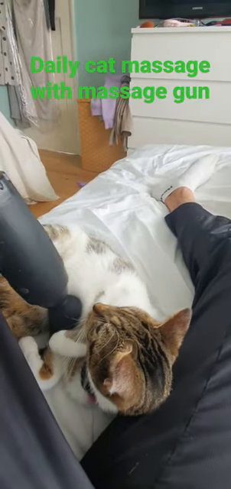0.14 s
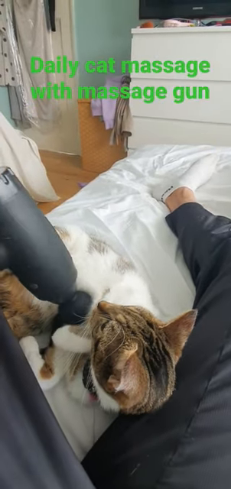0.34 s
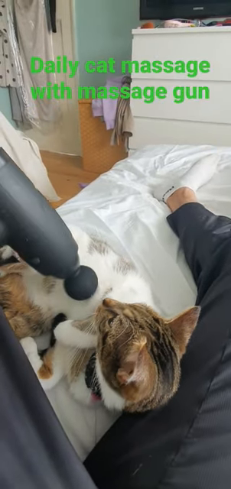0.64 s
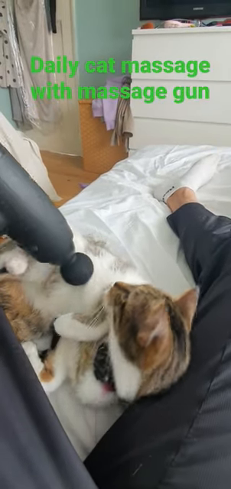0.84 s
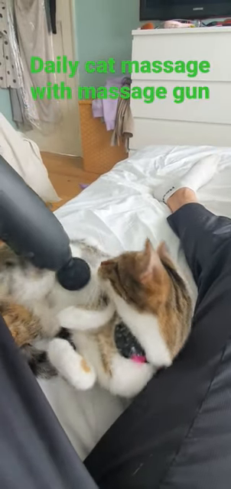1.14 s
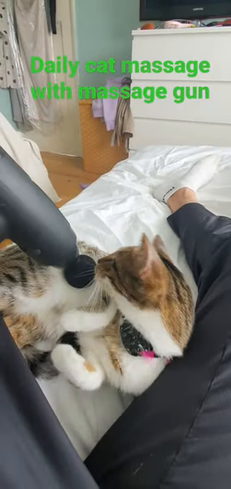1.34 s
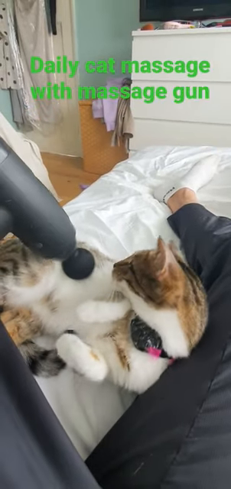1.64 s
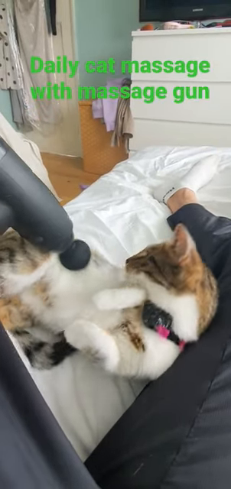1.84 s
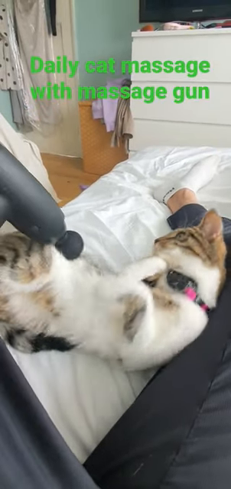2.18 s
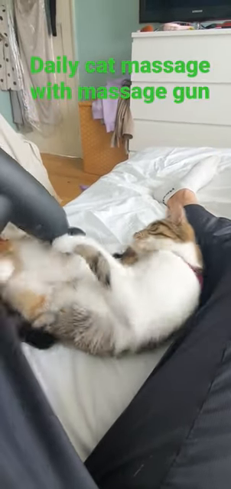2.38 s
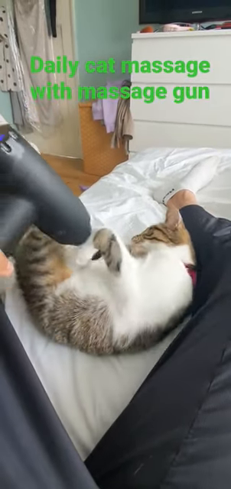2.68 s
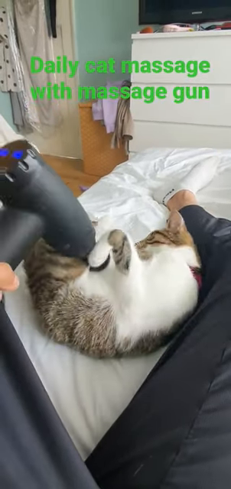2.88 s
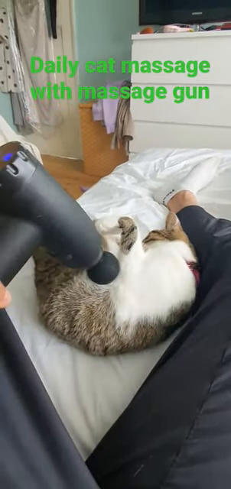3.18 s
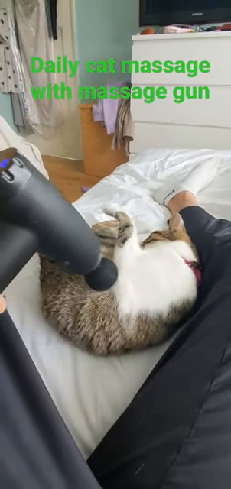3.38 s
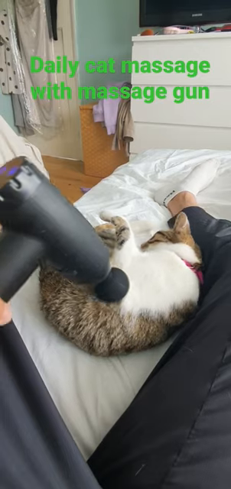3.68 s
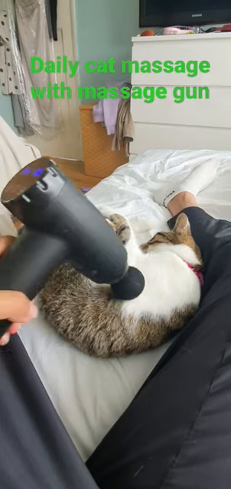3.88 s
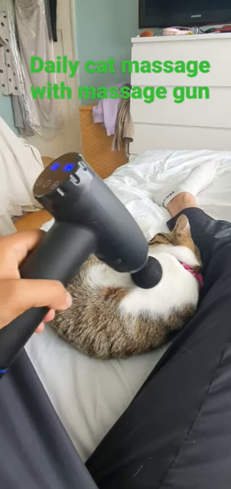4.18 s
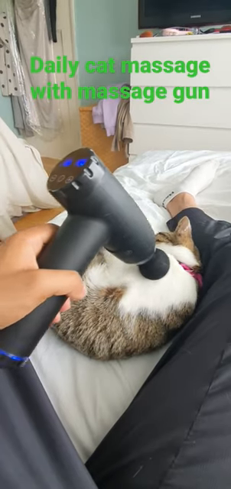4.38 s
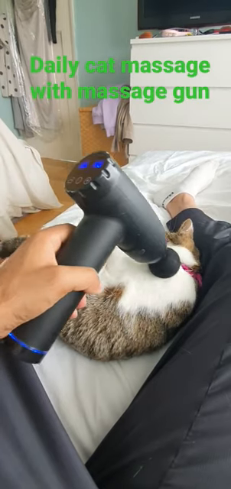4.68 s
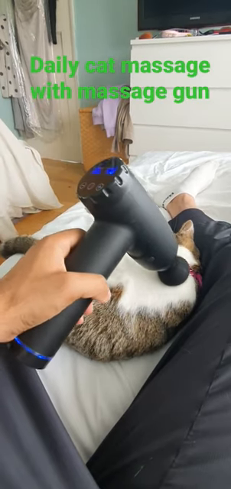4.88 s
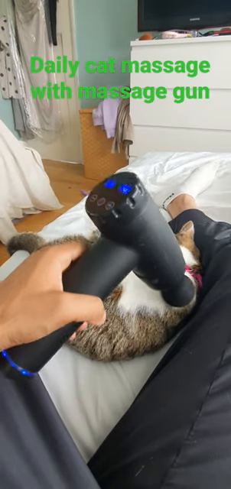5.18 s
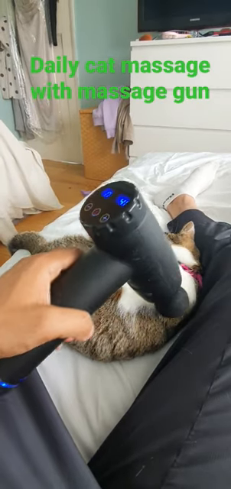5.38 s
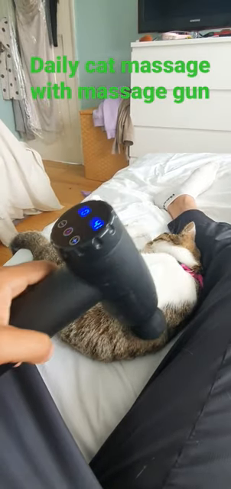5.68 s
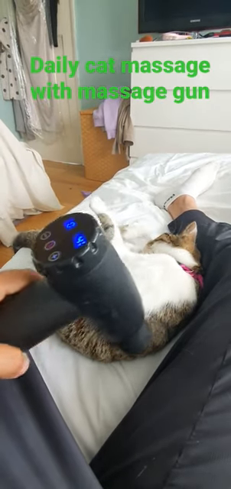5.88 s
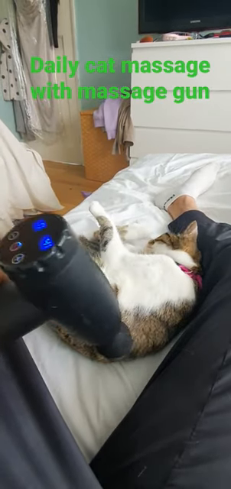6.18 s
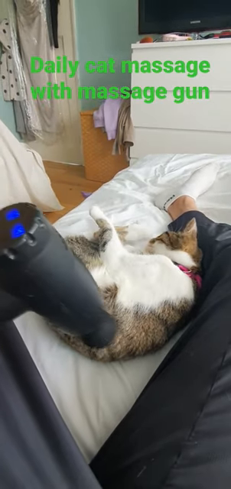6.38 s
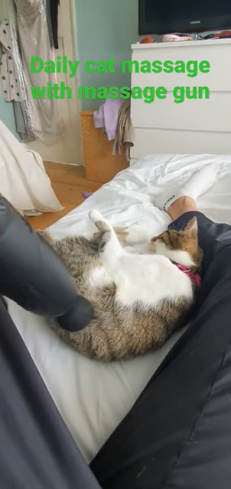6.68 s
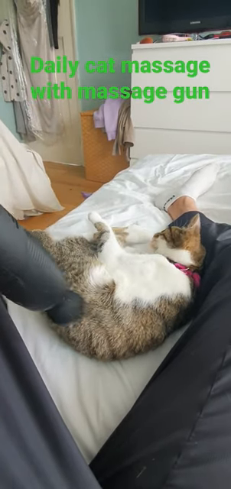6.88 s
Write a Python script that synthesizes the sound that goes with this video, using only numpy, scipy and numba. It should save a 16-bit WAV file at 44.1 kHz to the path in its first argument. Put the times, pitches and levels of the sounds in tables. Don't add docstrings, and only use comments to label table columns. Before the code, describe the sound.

A handheld percussion massager runs throughout, a steady low electric hum with a gritty casing buzz and gently surging pitch. Around one second its ball raps rapidly on something hard; fur and bedding rustle as a cat rolls over, with light glancing taps. A claw ticks, then a louder, hollower burst of knocks follows just after three seconds. The hum continues to the end. Close stereo phone microphone, quiet bedroom.

```python
import sys
import numpy as np
from scipy import signal
from scipy.io import wavfile
from scipy.ndimage import uniform_filter1d
from numba import njit

SR = 44100
rng = np.random.default_rng(int(sys.argv[2]) if len(sys.argv) > 2 else 0)


def wav_out(sig):
    wavfile.write(sys.argv[1], SR, np.round(np.clip(np.atleast_2d(sig).T, -1, 1) * 32767).astype(np.int16))


def level_to_linear(level):
    exponent = np.asarray(level, float) / 20
    return 10 ** exponent


N = 310464
HOP = 256


def evened(x):
    return x / np.sqrt(np.mean(x ** 2) + 1e-20)


def read(points, hz):
    f, value = np.transpose(points)
    return np.interp(np.log(hz + 1), np.log(f + 1), value)


def curves(rows):
    s, *columns = np.vstack(rows).T
    return [np.interp(np.arange(N) / SR, s, c) for c in columns]


def sides(pan_db):
    return level_to_linear(np.array([pan_db / 2, -pan_db / 2]))


def add(mix, start_s, sound):
    part = mix[:, round(start_s * SR):][:, :sound.shape[1]]
    part += sound[:, :part.shape[1]]


def resonate(x, hz, width_hz):
    return signal.lfilter(*signal.iirpeak(hz, hz / max(width_hz, 5), SR), x)


def swell(t, peak_s):
    return t / peak_s * np.exp(1 - t / peak_s)


def wander(shape, seconds):
    size = max(round(seconds * SR / HOP), 1)
    return evened(uniform_filter1d(uniform_filter1d(rng.standard_normal(shape), size), size))


def hiss(spectrum, patchy_db=2.0, flicker_db=1.5):
    # hz, left_right_likeness
    likeness = [(60, 0.77), (290, 1), (640, 0.6), (2000, 0.04), (6000, 0.011), (15000, 0.032)]
    # hz, left_right_db
    tilt = [(60, -8), (240, 4.5), (950, -2), (3770, -4), (15000, -7)]
    frames, hz = N // 128 + 5, np.fft.rfftfreq(512, 1 / SR)
    a, b, c, d, patches = rng.standard_normal((frames, 257, 5)).T
    patches = evened(uniform_filter1d(uniform_filter1d(patches, 16, 1), 8, 0))
    same = np.clip(read(likeness, hz), -1, 1)[:, None]
    left = a + 1j * b
    right = same * left + np.sqrt(1 - same ** 2) * (c + 1j * d)
    flicker = flicker_db * rng.standard_normal(frames)
    z = np.array([left, right]) * level_to_linear(read(spectrum, hz)[:, None] + patchy_db * patches + flicker)
    z *= sides(read(tilt, hz))[:, :, None]
    return evened(signal.istft(z, nperseg=512, noverlap=384)[1][:, :N])


def room(level_db=-60):
    # hz, density_db_per_hz
    air = [(15, -30), (30, -8), (70, 6), (150, -26), (260, -6), (500, -20), (1000, -15), (2500, -26.5),
           (4800, -31.5), (6800, -35), (8800, -39.5), (12500, -39.5), (15600, -38)]
    return level_to_linear(level_db) * hiss(air)


def rustle(split_hz=4600, firm_db_per_db=0.29, rest_db=-75.5, pan_db_per_db=-0.15):
    # peak_s, level_db, rise_db_per_s, fall_db_per_s
    rubs = [
        (.65, -68.5, 16, 16),
        (1.48, -60.5, 18, 80),
        (2.1, -60.5, 30, 44),
        (2.45, -48.5, 62, 70),
        (2.68, -64, 44, 50),
        (2.95, -67.5, 26, 50),
        (3.32, -66.5, 20, 17),
        (4.2, -67.5, 15, 9),
        (5.15, -67, 13, 25),
        (6.55, -64, 8.5, 13),
    ]
    # hz, density_db_per_hz
    fur = [(500, -51), (1000, 7.5), (2400, -2.5), (4200, -6.5), (7000, -2), (8800, -10), (12000, -10),
           (15600, -11)]
    t = np.arange(N) / SR
    power = level_to_linear(rest_db) ** 2
    for s, db, rise, fall in rubs:
        power = power + level_to_linear(db - np.where(t < s, rise, -fall) * (s - t)) ** 2
    level_db = 10 * np.log10(power)
    pan_db = pan_db_per_db * level_db
    rub = hiss(fur)
    middle = signal.sosfiltfilt(signal.butter(3, split_hz, fs=SR, output="sos"), rub)
    top = rub - middle
    rub = top + middle * level_to_linear(firm_db_per_db * (level_db - level_db.max()))
    return level_to_linear(level_db) * sides(pan_db - pan_db.mean()) * rub


def ticks():
    # start_s, peak_db, colour_hz, left_right_db
    claw = [
        (2.9248, -38, 5500, -13),
        (2.9305, -35, 3600, -5),
        (4.926, -57, 3670, -3),
    ]
    out, t = np.zeros((2, N)), np.arange(4000) / SR
    highpass = signal.butter(3, 2600, "highpass", fs=SR, output="sos")
    decay = level_to_linear(-60 * t / 0.0045) + level_to_linear(-20 - 60 * t / 0.15)
    for s, db, hz, pan_db in claw:
        grit = rng.standard_normal(len(t)) + .5 * rng.standard_normal((2, len(t)))
        thin = signal.sosfilt(highpass, grit)
        rung = resonate(resonate(thin, 0.98 * hz, 3300), 0.98 * hz, 3300)
        colour = evened(0.15 * thin + rung)
        add(out, s, level_to_linear(db - 0.5) * sides(pan_db)[:, None] * colour * decay)
    return out


def contacts(rebound_s=.0106, weak_lag_s_per_db=.0004, rebound_hz=1300):
    # start_s, ring_peak_db, ring_hz, snap_re_ring_db, rebound_peak_db
    first_bout = [
        (1.1954, -37.5, 1440, -23, -43.5),
        (1.2237, -46, 1310, -20, -46),
        (1.255, -39, 950, -19, -41.5),
        (1.2891, -40, 910, 2, -37.5),
        (1.3223, -30, 1110, -19, -37.5),
        (1.3533, -41, 2170, 3.5, -42.5),
        (1.3868, -42, 925, 10.5, -37.5),
        (1.4199, -32, 1160, -14.5, -37.5),
    ]
    second_bout = [
        (3.0966, -35, 1260, -40, -34.5),
        (3.1325, -34.5, 1350, -36, -38),
        (3.1604, -27, 1570, -39, -35.5),
        (3.1939, -24.5, 1280, -47, -32.5),
        (3.2252, -29, 1180, -26, -36.5),
        (3.256, -33, 1620, -60, -44),
    ]
    # start_s, ring_peak_db, ring_hz, left_right_db
    grazes = [(1.0067, -46, 935, -2), (1.484, -48, 1310, 0), (2.534, -46, 1110, -9),
              (2.5425, -42, 1400, -10), (2.5505, -38.5, 1270, -5), (2.5582, -41.5, 905, -10),
              (2.5707, -48, 900, 7), (2.5982, -41.5, 1000, 1), (2.632, -40.5, 840, -6),
              (2.6514, -48, 1270, 7), (2.662, -44.5, 1040, -9), (2.6776, -40, 1110, 7),
              (2.687, -45.5, 1380, 7), (2.6945, -47, 1290, -11), (2.711, -45, 910, 1),
              (2.7758, -51, 1470, -6), (2.8256, -48.5, 2980, -3), (5.153, -45.5, 1280, -4),
              (5.1854, -46.5, 1350, 2), (5.213, -48, 1350, -7)]
    rows = [(s, db, hz, -18, -1.5, pan_db) for s, db, hz, pan_db in grazes]
    # rebound_snap_db, rebound_push_db, strike_left_right_db, rebound_left_right_db
    first_feel, second_feel = (-9.5, 2.5, -5.5, 7.5), (-18, -1, 1, -6.5)
    for bout, feel in ((first_bout, first_feel), (second_bout, second_feel)):
        back_snap_db, back_push_db, pan_db, back_pan_db = feel
        for s, db, hz, snap_db, back_db in bout:
            push_db = 7 + 0.46 * snap_db
            back_s = s + rebound_s + weak_lag_s_per_db * max(-40 - back_db, 0)
            rows.append((s, db, hz, snap_db, push_db, pan_db))
            rows.append((back_s, back_db, rebound_hz, back_snap_db, back_push_db, back_pan_db))
    return rows


def knocks(ring_s=0.0011, shell_hz=690, shell_s=0.0023, push_hz=170, push_s=0.0012, port_lag_rad=1.36):
    out, t = np.zeros((2, N)), np.arange(2600) / SR
    bright = signal.butter(6, (1600, 6500), "bandpass", fs=SR, output="sos")
    lag = port_lag_rad * np.array([[0], [1]])
    late = t - .0038
    push = np.exp(-(late / push_s) ** 2) * np.cos(2 * np.pi * push_hz * late)
    push = push + 0.096 * swell(t, 0.0095) * np.sin(2 * np.pi * 95 * t)
    for s, db, hz, snap_db, push_db, pan_db in contacts():
        grit = rng.standard_normal((3, len(t)))
        near = grit[0] + 0.82 * grit[1:]
        rough = evened(resonate(resonate(near, 1.17 * hz, 1350), 1.54 * hz, 1600))
        ring = swell(t, ring_s) * np.sin(2 * np.pi * hz * t - lag)
        ring = ring + 0.43 * rough * (swell(t, ring_s) + 0.14 * swell(t, 0.011))
        snap = signal.sosfilt(bright, (near + resonate(near, 6000, 1800)) * swell(t, .00035))
        scatter = signal.sosfilt(bright, near * level_to_linear(-20 - 60 * t / 0.2))
        shell = swell(t, shell_s) * np.sin(2 * np.pi * shell_hz * t + grit[1:, :1])
        body = ring + level_to_linear(snap_db + 4) * (snap + scatter) + level_to_linear(push_db) * (push + shell)
        add(out, s, level_to_linear(db - 1.0) * sides(np.clip(pan_db, -7, 7))[:, None] * body)
    return out


def bearings(shaft, grit_turn=.33, whine_turn=.1, whine_hz=3430, whine_width_hz=60, port_lag_samples=3):
    # hz, width_hz, level_db
    casing = [(532, 195, -16.5), (1110, 330, -21), (1350, 128, -4), (1578, 140, -7), (1997, 150, -9),
              (3170, 216, -12.5), (3340, 102, -8), (3774, 150, -10), (3970, 300, -13)]
    # start_s, grit_db, whine_db
    rattle = [(0, -63.5, -69), (1.2, -67.5, -72), (2.4, -65, -78), (3.5, -64, -69), (4.6, -63.5, -71),
              (5.8, -63, -69.5), (6.3, -62.5, -66.5), (6.45, -64.5, -63), (7.04, -64.5, -62.5)]
    grit_db, whine_db = curves(rattle)
    stroke = 1 + .3 * np.cos(shaft + 2 * np.pi * grit_turn)
    sing = 1 + .3 * np.cos(shaft + 2 * np.pi * whine_turn)
    common, own = rng.standard_normal(N), rng.standard_normal((2, N))
    grit = 0.44 * np.array([np.roll(common, -port_lag_samples), common]) + .5 * own
    drive = stroke * (1 + .5 * np.cos(5 * shaft)) * grit
    rung = sum(level_to_linear(db) * resonate(resonate(drive, hz, width), hz, 2 * width) for hz, width, db in casing)
    whine = sing * resonate(resonate(grit, whine_hz, whine_width_hz), whine_hz, 3 * whine_width_hz)
    return level_to_linear(grit_db) * evened(rung) + level_to_linear(whine_db) * evened(whine)


@njit
def sum_orders(turn, order, height):
    out = np.zeros((2, len(turn)))
    for n in range(len(turn)):
        i = min(n // 256, height.shape[1] - 2)
        u, power, at = n / 256 - i, 1 + 0j, 0
        for k in range(len(order)):
            while at < order[k]:
                power, at = power * turn[n], at + 1
            for c in range(2):
                out[c, n] += (power * (height[c, i, k] * (1 - u) + height[c, i + 1, k] * u)).real
    return out


def motor(low_rpm=1869.3, surge_s=.064, drift_db=2.5, drift_rad=.45, db_per_rpm=0.0726,
          tenth_db_per_rpm=0.0354, turned_db=2.):
    # peak_s, gain_rpm
    surges = [(.168, 48), (.774, 31), (1.071, 42), (1.521, 36), (1.648, 42), (1.955, 39), (2.274, 49),
              (2.531, 62), (2.85, 48), (3.425, 50), (3.735, 46), (4.046, 42), (4.335, 27), (4.624, 32),
              (4.912, 31), (5.01, 23), (5.229, 56), (5.822, 55), (6.108, 59), (6.4, 58), (6.722, 60),
              (6.981, 38)]
    # start_s, body_pressure_db, nearness_db, free_casing_db, turned_left_right_db
    grip = [(0, -9, 0.5, 0, .5), (.4, -2, 1.5, 2.5, 0.5), (.6, 5.5, 0.5, 2.5, 1), (.8, -17, 0, 0, 2),
            (1.0, -2.5, -1, 0, 2), (1.4, -3, -0.5, -0.5, 2), (2.0, -2, -2.5, -1.5, 2),
            (2.8, 0, -2.5, -1.5, 5), (3.2, 5.5, 0.5, 1, 4.5), (3.5, 0, -0.5, 0.5, 2),
            (4.2, -1, -0.5, 1, 1.5), (4.8, -4.5, -3.5, -0.5, 3.5), (5.2, -4.5, -0.5, 1, 5),
            (5.6, -9, -0.5, -1, -1.5), (5.8, -8, 0, -3, -0.5), (6.1, -2.5, 0, -3, -1.5),
            (6.4, 5, 0.5, -3.5, -2), (7.04, 2, 0, -2, -1.5)]
    # shaft_order, left_db, right_db
    crank = [(1, -66, -66), (2, -64, -62), (3, -67, -65), (4, -75, -71), (5, -78, -75), (6, -83, -77),
             (7, -74, -71), (8, -80, -77), (9, -73, -68)]
    # shaft_order, left_db, right_db
    poles = [(10, -56, -49), (15, -73, -84), (20, -55, -49), (25, -53, -57), (30, -62, -70), (35, -72, -70),
             (40, -76, -66), (45, -64, -71), (50, -80, -83), (60, -78, -79)]
    # shaft_order, left_db, right_db
    sidebands = [(11, -67, -69), (12, -75, -73), (13, -75, -78), (14, -80, -77), (16, -77, -68),
                 (17, -78, -80), (18, -80, -79), (19, -66, -69), (21, -60, -54), (22, -69, -68),
                 (23, -72, -68), (24, -60, -59), (26, -68, -64), (27, -73, -70), (28, -72, -74),
                 (29, -70, -76), (31, -76, -70), (34, -75, -75), (36, -76, -74), (37, -76, -77),
                 (38, -81, -79), (39, -81, -71), (41, -75, -69), (42, -67, -69), (43, -63, -69),
                 (44, -73, -71), (46, -68, -74), (47, -72, -80), (64, -77, -78)]
    # hz, early_turns
    load_turn = [(315, .2), (630, -.07), (800, -.05), (1100, .28), (2000, .35)]
    # hz, left_lead_rad
    side_lead = [(280, 0.), (345, .6), (600, -.7), (630, 1.6), (665, -.8), (715, .3), (755, -1.),
                 (790, -.5), (835, 2.4), (950, 1.6), (1350, 0.), (2000, 1.5)]
    # hz, left_lead_rad
    turn_lead = [(570, 0.), (600, 3.3), (630, 0.), (665, 1.4), (755, 2.6), (790, 2.2), (835, 0.),
                 (1350, 1.8)]
    t = np.arange(N) / SR
    rpm = low_rpm + sum(gain * np.exp(-.5 * ((t - s) / surge_s) ** 2) for s, gain in surges)
    shaft = 2 * np.pi * np.cumsum(rpm / 60) / SR
    table = np.array(sorted(crank + poles + sidebands))
    order, mean_db = np.round(table[:, 0]), table[:, 1:].T[:, :, None]
    hz = order * rpm.mean() / 60

    thud_db, upper_db, twentieth_db, pan_db = (c[::HOP] for c in curves(grip))
    extra_rpm = rpm[::HOP] - rpm.mean()
    tenth_db = -0.73 + upper_db - 0.48 * twentieth_db + tenth_db_per_rpm * extra_rpm
    twentieth_db = twentieth_db + db_per_rpm * extra_rpm
    held = np.array([thud_db, thud_db, 0 * pan_db, tenth_db, twentieth_db, upper_db, .5 * upper_db])
    follows = np.array([np.interp(order, [1, 3, 4, 10, 20, 21, 40], row) for row in np.eye(7)]).T
    weak = np.clip((-49.5 - mean_db) / 12, 0, 1.5) * np.where(order % 5, 1, .5)[:, None]
    half = np.array([.5, -.5])[:, None, None]
    waver_db = drift_db * weak * wander((2, len(order), held.shape[1]), 0.31)
    level_db = mean_db + follows @ held + pan_db * half + waver_db

    nearest = np.round(order / 5 - .2).astype(int)
    offset = order - 5 * nearest
    swing = 2 * np.pi * offset * read(load_turn, 5 * nearest * rpm.mean() / 60)
    pole = rng.uniform(0, 2 * np.pi, 40)[nearest] + swing
    loose = np.where(abs(offset) > 1, 1.6, .2)
    flip = np.pi * np.isin(order, (9, 19))
    phase = pole + loose * rng.standard_normal(len(order)) + flip
    aside = np.clip(pan_db / turned_db, 0, 1)
    apart_orders = order > 9
    lead = (read(side_lead, hz) * apart_orders)[:, None] + read(turn_lead, hz)[:, None] * aside
    shared = wander((len(order), held.shape[1]), 0.053)
    apart = apart_orders[:, None] * wander(level_db.shape, 0.2)
    phase = phase[:, None] + lead * half + drift_rad * weak * (shared + .5 * apart)
    height = np.sqrt(2) * level_to_linear(level_db) * np.exp(1j * phase)
    return shaft, sum_orders(np.exp(1j * shaft), order, height.transpose(0, 2, 1).copy())


def scene():
    shaft, hum = motor()
    return room() + rustle() + ticks() + knocks() + bearings(shaft) + hum


def low_pass(x):
    return signal.sosfilt(signal.butter(12, 16400, fs=SR, output="sos"), x)


def record(dry):
    lowpass = signal.firwin(511, 15560, window=("kaiser", 9), fs=SR)
    limited = signal.oaconvolve(dry, lowpass[None], "same")
    return low_pass(limited)


dry = scene()
out = record(dry)
wav_out(out)
```